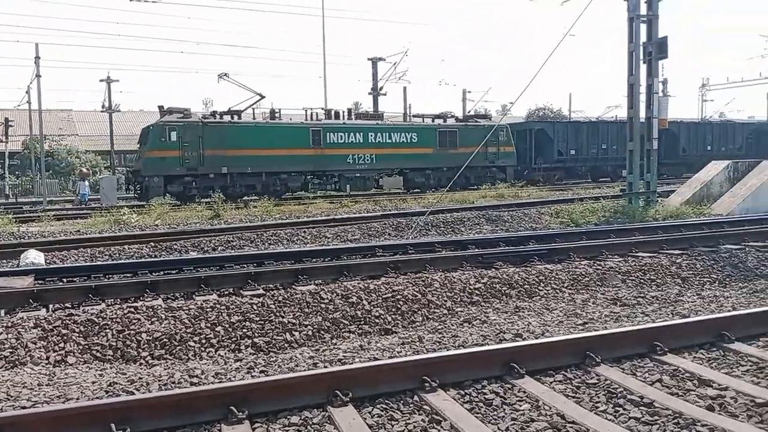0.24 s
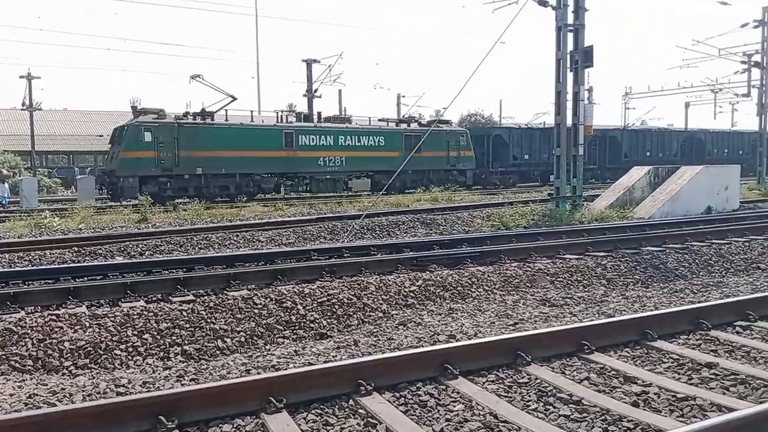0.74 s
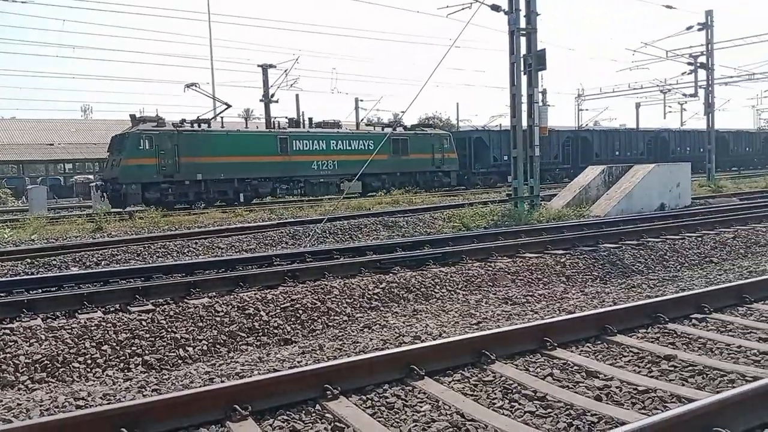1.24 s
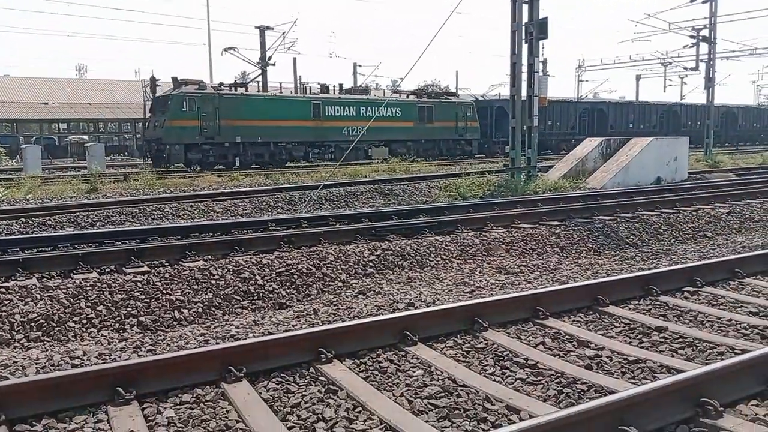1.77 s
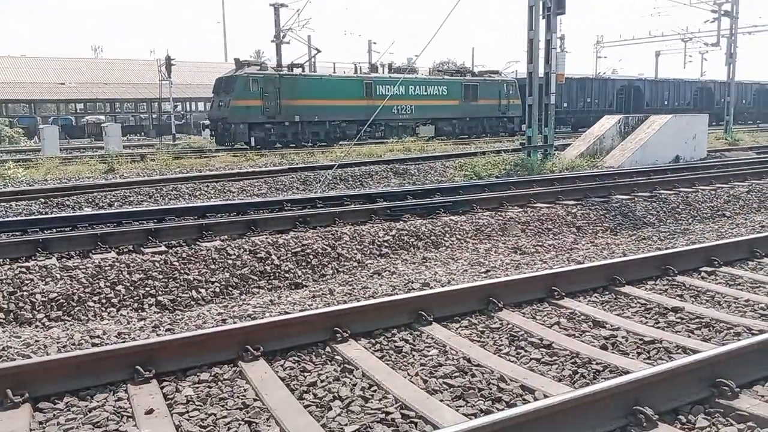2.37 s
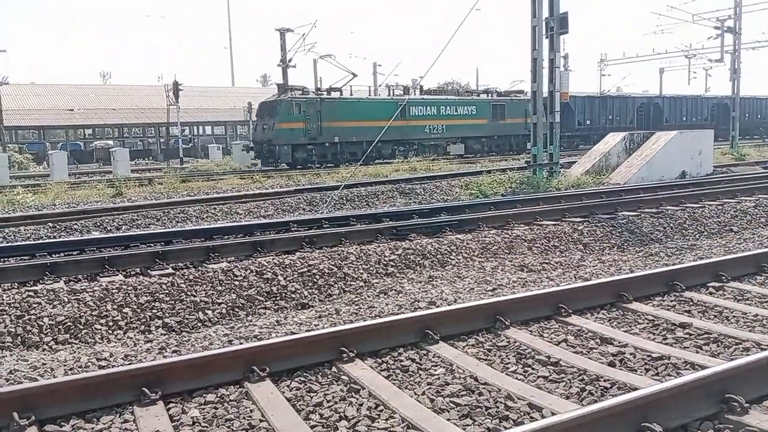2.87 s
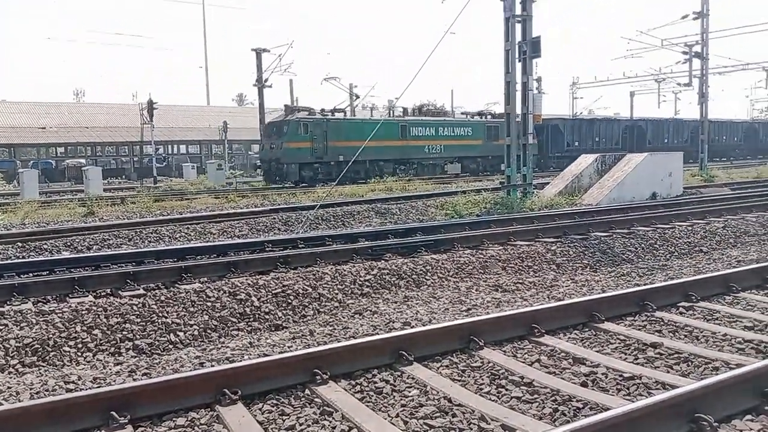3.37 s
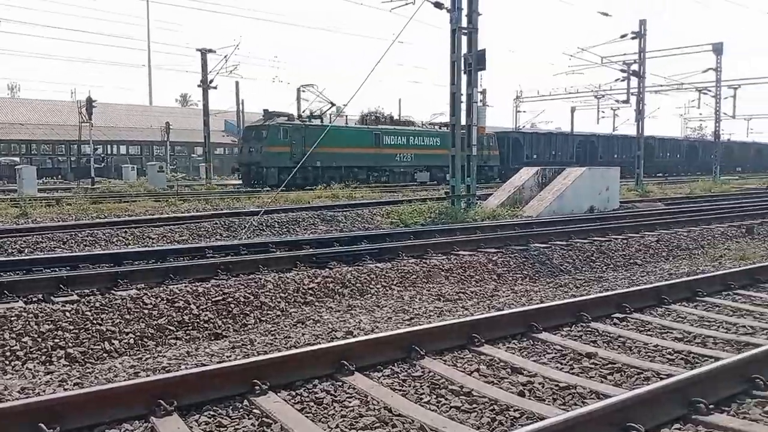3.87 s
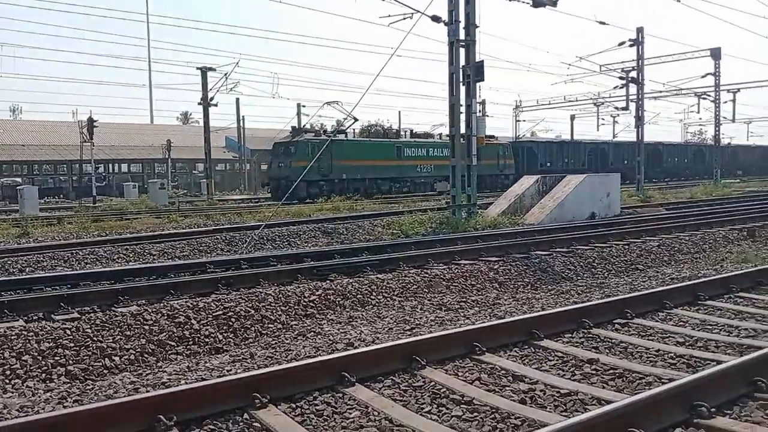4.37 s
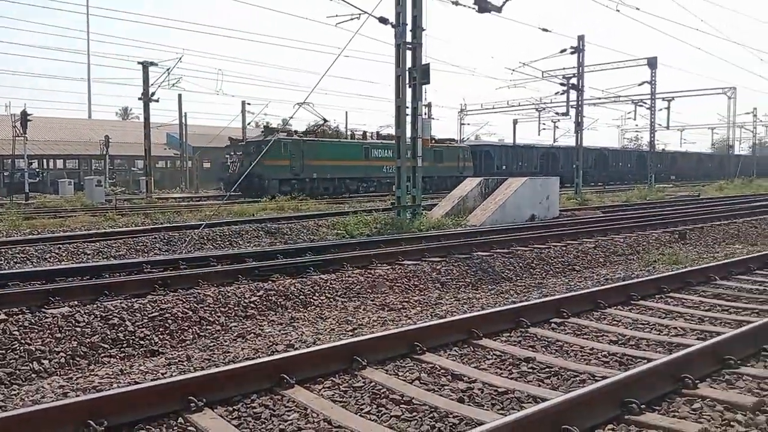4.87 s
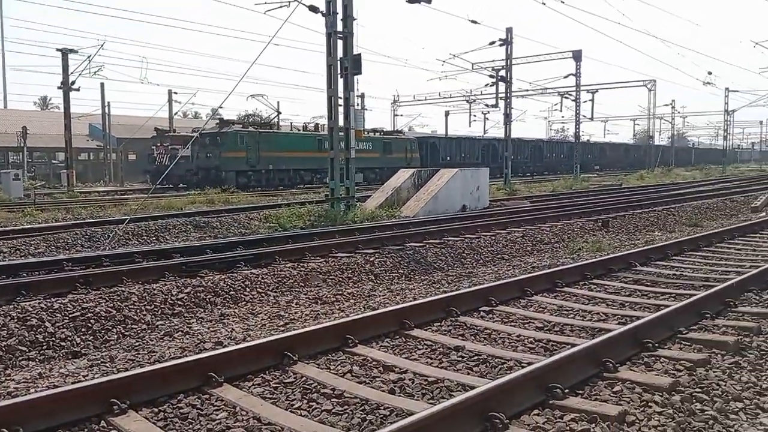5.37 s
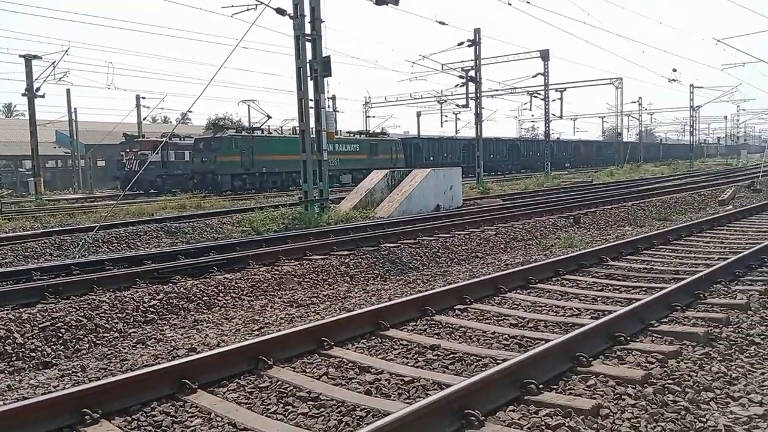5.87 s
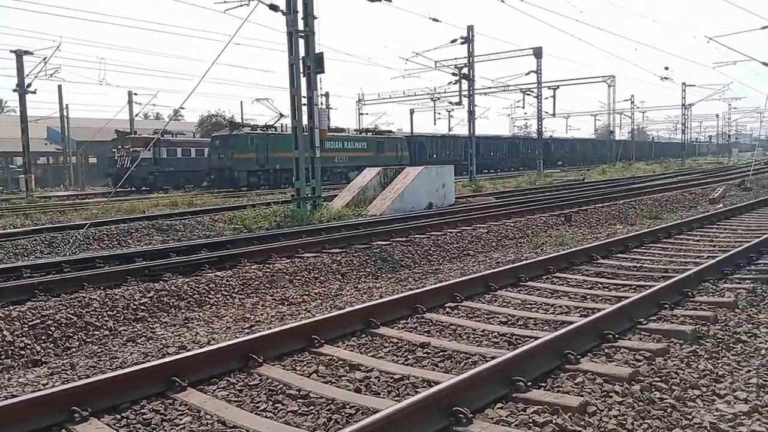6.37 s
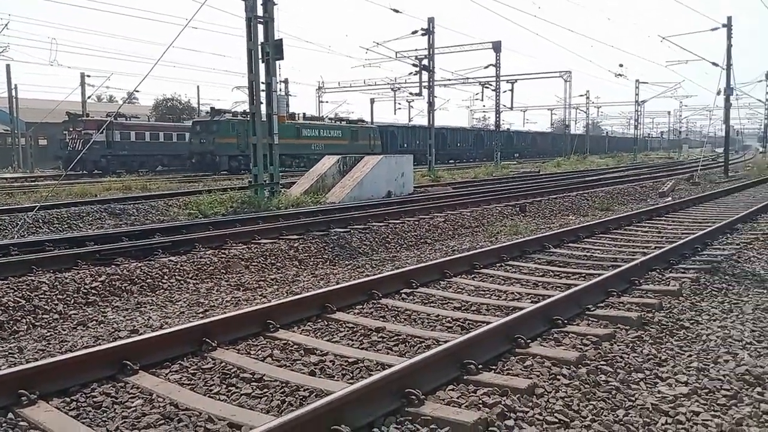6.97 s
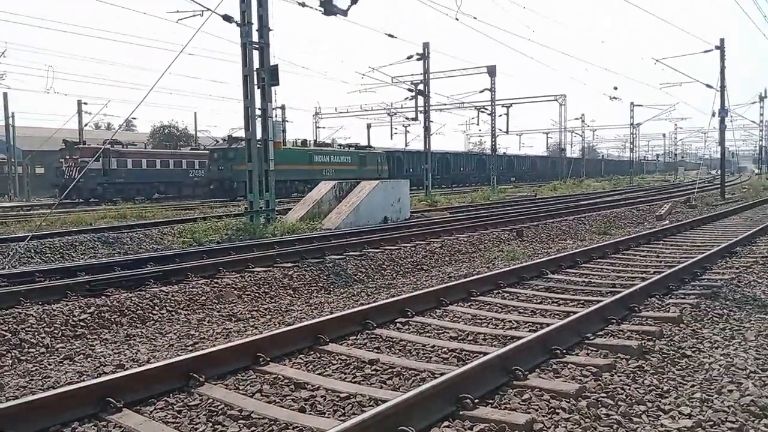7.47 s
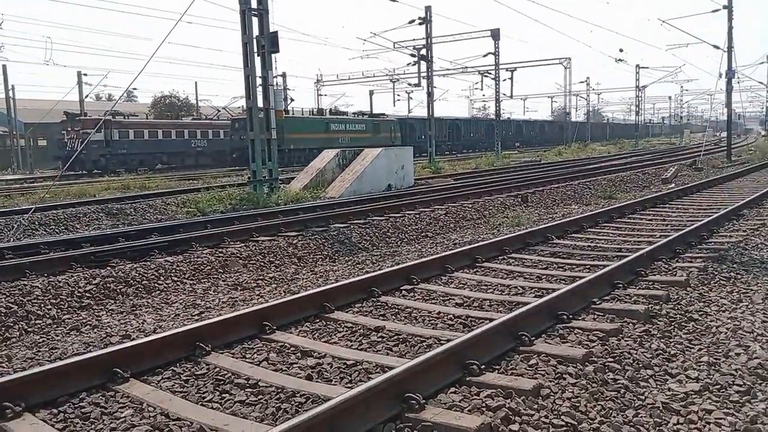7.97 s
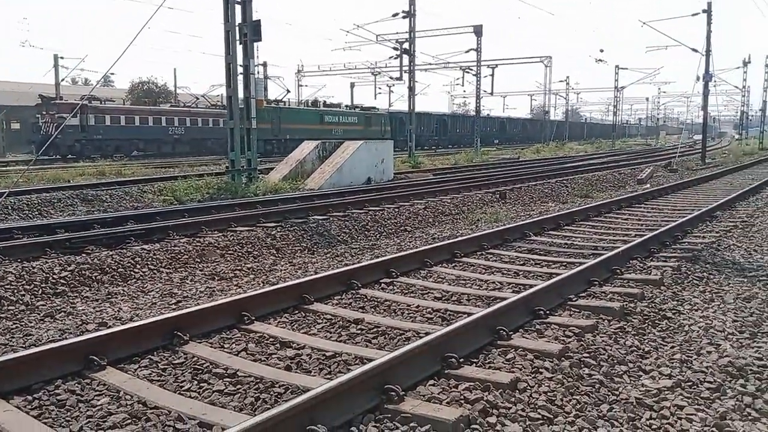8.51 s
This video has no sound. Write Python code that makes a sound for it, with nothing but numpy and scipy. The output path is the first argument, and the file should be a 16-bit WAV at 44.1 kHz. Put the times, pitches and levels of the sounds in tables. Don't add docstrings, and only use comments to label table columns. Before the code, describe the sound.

Outdoors beside rail yard tracks, a phone picks up a freight locomotive rolling slowly away. A soft gritty wheel-and-fan wash and wavering low hum with a thin whine run throughout, with faint, high flange squeals mainly in the first second. Two quick air spits come near 0.65 and 0.7 s, then a strong broad hiss swells from 0.9 to 1.5 s. A small puff ticks at 2.0 s. A brighter blast follows from 2.8 to 3.25 s, then a quieter gap. At 4.4 s a sharp burst runs into a longer hiss that sags until 5.3 s; another lasts from 5.5 to 5.8 s. From 6.2 to 7.5 s somewhat softer bursts nearly join, and a last one swells at 7.7 s, peaks near 8 s and trails into the end around 8.7 s. Brief echoes follow closings; light wind bumps the microphone.

```python
import sys
import numpy as np
from scipy import signal
from scipy.fft import rfft, irfft
from scipy.io import wavfile
from scipy.ndimage import uniform_filter1d, minimum_filter1d

SR = 44100
rng = np.random.default_rng(int(sys.argv[2]) if len(sys.argv) > 2 else 0)


def attenuation_scalar(level_db):
    decades = np.asarray(level_db, float) / 20
    return 10 ** decades


def store_pcm(level_fs):
    pcm = np.round(np.clip(level_fs, -1, 1) * 32767).astype(np.int16)
    wavfile.write(sys.argv[1], SR, np.atleast_2d(pcm).T)


N = 385564

# (valve opens [s], pressure crest [s], valve shuts [s], closing time [s])
BURSTS = [(.646, .66, .697, .012), (.71, .72, .765, .02), (.931, 1.14, 1.54, .02),
          (2.015, 2.06, 2.105, .02), (2.777, 3.1, 3.255, .05), (4.374, 4.395, 4.52, .02),
          (4.513, 4.525, 5.29, .055), (5.467, 5.5, 5.777, .04), (6.234, 6.26, 6.51, .04),
          (6.49, 6.53, 6.94, .05), (6.925, 7.2, 7.49, .06), (7.689, 7.98, 8.45, 3)]
# (core at crest [dB], first puff against crest [dB], sag until shutting [dB],
# sag shape [power], yard echo below that [dB])
STROKES = [(-37.5, -3, -1.5, 1.3, -4), (-24.5, 1, -14, 0.5, -2), (-16, -1.5, -5.5, 2.5, -5.5),
           (-31, -10, -8.5, 1.2, -9), (-15.5, -2.5, -5, 0.76, -13.5), (-18, 0, -3, 0.97, -26),
           (-18, 7, -9.5, 0.46, -13), (-15.5, -6, -7, 0.41, -17), (-21.5, -3, -1.5, 1, -2),
           (-21.5, -22, -4, 0.57, -1), (-23.5, 0, -6.5, 3.1, -11), (-22.5, -3.5, -5.5, 0.92, -16)]
# (roar on opening [dB], roar on shutting [dB], shoulder at crest [dB], fizz [dB])
JETS = [(-1, 3.5, -10, -18), (-3, -1.5, -13, -22), (-1, -15, -9, -12.5), (-8, 2.5, -9, -16),
        (-2, -16.5, -3.5, -16.5), (-1, -9.5, 2.5, -15), (-2, -6.5, 2.5, -14.5), (-13, -11, -2, -18),
        (-5.5, -11, -10, -20), (-14, -6, -11.5, -21), (-4.5, -9, -10, -19), (-7.5, -12, -7.5, -17)]
# (lowest ground hollow [factor], upper hollows [factor], rumble [dB], top sizzle [dB])
OUTLETS = [(.8, .8, 10, 5), (-2, .8, 4.5, 4), (0, .9, -0.5, -5), (0, .8, -15, -8), (1.5, 0.35, 22, 4),
           (2, 0.88, 5, 1), (1.5, 0.93, 1, 1), (0.5, 1.3, -12, -6), (1.5, 0.98, 0, -4), (1, 0.64, -4, -2),
           (0, 0.44, -9, -2), (-0.5, 0.3, -23, -7)]
# (pitch on opening [Hz], pitch on shutting [Hz], level [dB])
RINGS = [(5500, 5500, 4), (5600, 4800, 3.5), (5740, 8000, 0), (5500, 5500, -0.5), (5500, 7000, 3.5),
         (5800, 6300, 5), (6140, 5420, 5.5), (6100, 5350, 5), (5450, 5600, 0.5), (5760, 6400, 1),
         (6140, 4770, 4.5), (5900, 5150, 2.5)]
# (centre [Hz], width [Hz], level [dB])
WAGON_LOBES = [(3000, 400, -12), (2960, 400, -15), (3040, 230, -0.5), (3000, 400, 7), (4430, 210, -13),
               (7270, 350, 6), (3150, 120, 1.5), (4900, 560, -2.5), (3400, 160, 5.5), (6180, 260, -12),
               (4730, 320, 5.5), (3280, 390, 8)]
# (centre [Hz], width [Hz], on opening [dB], on shutting [dB])
DRIFTING_LOBES = [(3500, 200, 10, 12), (1840, 180, -6, -6), (2900, 400, 3.5, 5), (3000, 400, -1, 2),
                  (3100, 630, -3.5, 7), (8200, 500, -2, 4), (4630, 440, -5, 4), (4550, 450, -1, 0),
                  (8500, 500, -2, 1.5), (8500, 500, 1.5, -1), (2050, 300, -1, 4), (2110, 430, 7.5, -11)]
# (on opening [dB], on shutting [dB])
AIR = [(5, -1), (2, 5), (-1.3, 4.5), (-12, 1), (7, -0.5), (0, -1), (2, 0), (2, 4), (-1, -3), (0.3, 0.3),
       (-3, 2), (-5, -2.5)]
# (roar against core [dB], fizz against core [dB], fizz dying [dB/s],
# loss at the very top [dB per dB of faintness])
TAILS = [(-.4, -.4, 168, 1.3), (-.4, -.4, 120, 1.3), (-.4, -5, 85, 1.5), (-.4, -.4, 168, 1.3),
         (-.4, -3, 140, 1.2), (-.4, -.4, 168, 1.3), (-9, -.4, 168, 1.1), (3, -3, 168, 1.5),
         (-.4, -.4, 168, 1.3), (-.4, -.4, 168, 1.6), (1.5, -.4, 240, 1.9), (-.4, -.4, 168, 1.3)]
SHADED_DB = [2, .2, -7, .2, 2, 3, -1, -4, -15, .2, 6, -3]
# (frequency [Hz], density [dB per Hz])
NEAR_VALVE = [(410, -58), (700, -23.5), (787, -9.5), (994, -13.5), (1450, 0), (1700, -2.5), (2200, -4),
              (3050, -13.5), (3840, -21.5), (5520, -11), (6200, -16), (6790, -11), (7540, -10.5),
              (9900, -23.5), (12001, -17), (15600, -18)]
# (frequency [Hz], density [dB per Hz])
FAR_VALVE = [(1000, -45), (1700, -22.5), (1950, -20), (3140, -13.5), (4140, -11), (5080, 4), (5570, 6),
             (7030, -4.5), (7570, -6.5), (8940, -29), (10900, -31.5), (12300, -30.5), (13800, -28),
             (14900, -35.5), (15600, -24.5)]
# (from [Hz], to [Hz])
JET_BANDS = [
    (1900, 3600),
    (4600, 6300),
    (6500, 7800),
    (9000, 15500),
]
FAR_FROM_S, RING_WIDTH_HZ = 2.5, 430
SHADED_HZ, SHADED_WIDTH_HZ, SHADED_S = 3800, 430, 0.026
ECHO_FILL = .6


def valves():
    hz, t = stft_axes(size=256)
    power = np.full((len(hz), len(t)), 1e-15)
    ripples = rng.standard_normal((len(BURSTS), len(hz)))
    settings = zip(BURSTS, STROKES, JETS, OUTLETS, RINGS, WAGON_LOBES, DRIFTING_LOBES, AIR, TAILS,
                   SHADED_DB, ripples)
    for burst, stroke, jet, outlet, ring, lobe, drift, air, tail, shaded_db, ripple in settings:
        opens, _, shuts, closing = burst
        low, upper, rumble_db, sizzle_db = outlet
        spectrum = NEAR_VALVE if opens < FAR_FROM_S else FAR_VALVE
        colour = read(spectrum, hz) + dips(hz, low, upper) + 1.6 * ripple
        colour += rumble_db * np.interp(hz, [1000, 1900], [1, 0])
        colour += sizzle_db * np.interp(hz, [13800, 15300], [0, 1])
        colour[hz < 800] = -90
        colour += lobe[2] * bell(hz, *lobe[:2])[:, 0]

        on = (t >= opens) & (t < shuts + 1.2)
        now = t[on]
        levels = jet_levels(now, burst, stroke, jet, tail)
        field = steered(colour, hz, now, JET_BANDS, now, levels)

        faint_db = np.maximum(-45.5 - levels[-1], 0)
        field -= tail[3] * np.outer(np.interp(hz, [10500, 13500], [0, 1]), faint_db)

        ring_hz = np.interp(now, [opens, shuts], ring[:2])
        field += ring[2] * bell(hz, ring_hz, RING_WIDTH_HZ)
        airy = np.interp(hz, [11000, 12200, 14000, 14900], [0, 1, 1, 0])
        field += np.outer(airy, np.interp(now, [opens, shuts], air))
        field += bell(hz, *drift[:2]) * np.interp(now, [opens, shuts], drift[2:])
        closed = np.clip((now - shuts) / closing, 0, 1)
        field -= ECHO_FILL * np.outer(dips(hz, low, 0), closed)
        late = np.exp(-((now - opens) / SHADED_S) ** 4)
        field += shaded_db * bell(hz, SHADED_HZ, SHADED_WIDTH_HZ) * late
        power[:, on] += attenuation_scalar(2 * field)
    gust = evened(uniform_filter1d(rng.standard_normal(len(t)), size=8))
    return noise(10 * np.log10(power) + 0.17 * gust, 1.17, bins=2, frames=80)


LINGER = [
    1.8,
    1,
    1.2,
    1.7,
]
ECHO_DB_PER_S = [
    47,
    43,
    51,
]
ECHO_TINT_DB = [
    -0.5,
    0.4,
]
OPENING_S, HUSH_DB = .013, -24
SPIT_DB, SPIT_S = 2.5, 0.01
ROAR_LAG_DB, FIZZ_LAG_DB, LAG_S = -3.5, -1, 0.069
SHOULDER_SAG, FIZZ_SAG = 0.93, 0.36


def jet_levels(t, burst, stroke, jet, tail):
    opens, crest, shuts, closing = burst
    crest_db, first_db, sag_db, shape, echo_db = stroke
    roar_open, roar_shut, shoulder, fizz = jet
    age, after = t - opens, np.maximum(t - shuts, 0)
    sag = sag_db * np.clip((t - crest) / (shuts - crest), 0, 1) ** shape
    core = crest_db + np.interp(t, [opens, crest], [first_db, 0]) + sag
    core += SPIT_DB * np.exp(-age / SPIT_S)
    core += HUSH_DB * np.clip(1 - age / OPENING_S, 0, 1)
    lag = np.exp(-age / LAG_S)
    roar = np.interp(t, [opens, shuts], [roar_open, roar_shut]) + ROAR_LAG_DB * lag
    colours = [roar, 0 * t, shoulder + SHOULDER_SAG * sag, fizz + FIZZ_SAG * sag + FIZZ_LAG_DB * lag]
    tints = [tail[0], *ECHO_TINT_DB, tail[1]]
    fades = [*ECHO_DB_PER_S, tail[2]]
    levels = []
    for colour, slow, tint, fade in zip(colours, LINGER, tints, fades):
        lasts = closing * slow
        drop = np.minimum(after / lasts, 1) * (echo_db + tint)
        levels.append(core + colour + drop - fade * np.maximum(after - lasts, 0))
    return levels


# (centre [Hz], width [Hz], depth [dB])
GROUND_DIPS = [(3926, 325, -7), (8300, 420, -3), (10400, 250, -3.5), (13500, 600, -14)]


def dips(hz, low, upper):
    depths = [low] + [upper] * (len(GROUND_DIPS) - 1)
    return sum(depth * db * bell(hz, f, width)[:, 0] for depth, (f, width, db) in zip(depths, GROUND_DIPS))


# (time [s], machinery [dB], wheel hiss [dB])
ROLL = [(0, -28, -41), (.2, -26, -40), (.5, -28, -40.5), (.9, -26.5, -39.5), (1.4, -31, -33.5),
        (2, -30.5, -41), (2.7, -30.5, -38.5), (3.1, -38, -34.5), (3.6, -31.5, -41), (4.3, -37, -43.5),
        (4.8, -32.5, -30), (5.31, -36, -44.5), (6, -36, -46.5), (6.7, -34, -39.5), (7.2, -30, -42),
        (7.6, -33.5, -47), (8.1, -32.5, -39.5), (8.74, -32, -36.5)]
# (frequency [Hz], density [dB per Hz])
WASH = [(330, -37), (560, -23), (690, -0.5), (782, -5.5), (899, -5.5), (1060, -9.5), (1420, 4.5),
        (2190, -12), (3370, -15.5), (4270, -16), (5270, -13), (5810, -14), (7890, -29), (8570, -50.5),
        (11400, -61), (12600, -70), (15600, -80)]
# (from [Hz], to [Hz])
ROLL_BANDS = [
    (600, 1750),
    (2300, 3500),
    (3800, 4500),
    (4900, 7600),
    (8600, 11500),
]
# (time [s], level against upper hiss [dB])
HOLLOW = [(1.8, -7.5), (2.15, -14.5), (4.4, -12), (5.4, -6.5), (7.6, -10.5)]
# (time [s], level [dB])
WHEEL_FIZZ = [(0, -70), (.6, -68.5), (1.8, -74), (2.6, -75.5), (3.5, -76), (4.3, -80), (6, -76.5),
              (7.6, -77)]
# (centre [Hz], width [Hz], first [dB], midway [dB], last [dB])
WASH_LOBES = [(790, 37, .2, -3.5, 0.5), (1015, 54, -1, 1.5, 1), (1196, 66, 1.5, -3.5, -6.5),
              (1710, 140, -6.5, 0.6, -1), (2170, 170, 2, -0.5, -0.7), (3000, 410, -2.5, 1.5, -3),
              (3440, 130, 1, -0.5, 1.5), (5050, 360, 2, -3.5, 3)]
HISS_TOP_DB, HISS_TOP_SHARE = -41.5, 0.76


def rolling():
    hz, t = stft_axes(size=1024)
    s, machinery, hiss = np.transpose(ROLL)
    machinery, hiss = np.interp(t, s, machinery), np.interp(t, s, hiss)
    top = HISS_TOP_DB + HISS_TOP_SHARE * (hiss + 43)
    hollow = top + np.interp(t, *np.transpose(HOLLOW))
    fizz = np.interp(t, *np.transpose(WHEEL_FIZZ))
    field = steered(read(WASH, hz), hz, t, ROLL_BANDS, t, [machinery, hiss, hollow, top, fizz])
    for centre, width, *db in WASH_LOBES:
        field += bell(hz, centre, width) * np.interp(t, [0, N / SR / 2, N / SR], db)
    patchy_db = np.interp(hz, [1100, 1400, 2500, 4500, 5200, 7000, 9000], [4.4, 2.4, 3.6, 4.2, 2.4, 2.6, 6])
    return noise(field, patchy_db[:, None], bins=3, frames=18)


# (pitch [Hz], width [Hz], level [dB])
HUM_LINES = [
    [(215, 9.7, -8), (238.6, 9.3, -8), (227.7, 47.5, -3.5)],
    [(699, 2, -2), (1322, 26, -4)],
    [(887, 12.6, -7)],
    [(1394, 12.5, -3.5)],
]
# (start [s], length [s], level [dB])
PAIR_SWELLS = [(0, 0.32, -26), (0.32, 0.318, -27), (0.691, 0.031, -27), (0.748, 0.14, -32),
               (0.897, 0.18, -37.5), (1.17, 0.18, -39.5), (1.668, 0.041, -36), (1.741, 0.22, -36),
               (2.277, 0.2, -39), (2.496, 0.13, -30.5), (2.637, 0.36, -42), (3.766, 0.17, -37),
               (4.195, 0.18, -48), (4.34, 0.16, -38), (4.523, 0.099, -32.5), (4.7, 0.16, -35.5),
               (4.978, 0.1, -40), (5.109, 0.134, -36), (5.3, 0.36, -50), (5.748, 0.061, -40),
               (6.942, 0.063, -48), (8.01, 0.091, -38)]
WHINE_SWELLS = [(0, 0.16, -32), (.35, .4, -36), (1.56, 0.16, -36), (1.65, .7, -31.5), (2.55, .28, -31.5),
                (3.4, 0.097, -37), (3.72, 0.12, -44), (3.93, 0.16, -53), (4.15, 0.19, -39.5),
                (4.57, 0.025, -29), (4.7, 0.077, -37.5), (5, .2, -44), (5.35, 0.26, -44.5),
                (5.94, 0.25, -44), (6.2, 0.2, -43.5), (6.68, .25, -42), (7.04, 0.071, -41),
                (7.16, 0.44, -37.5), (7.8, 0.054, -36), (8, 0.099, -37), (8.15, 0.12, -34),
                (8.31, 0.17, -36.5), (8.48, 0.072, -43), (8.64, 0.063, -39)]
SECOND_SWELLS = [(.65, 0.21, -36), (.96, .3, -40), (1.66, 0.056, -34), (2.45, 0.041, -33), (2.8, 0.11, -29),
                 (3.76, 0.075, -31), (4.6, 0.044, -34), (4.8, 0.066, -41), (5.58, .12, -33),
                 (5.73, 0.16, -33), (5.95, 0.06, -36), (7.3, .3, -40), (8.1, .3, -43)]
OVERTONE_SWELLS = [(0, .5, -38), (.75, 0.23, -39), (1.75, .5, -44), (2.3, 0.68, -34.5), (3.78, .14, -29.5),
                   (3.96, 0.11, -31.5), (4.1, 0.059, -38), (4.7, 0.1, -48), (6.7, 0.092, -33), (8, .3, -45),
                   (8.35, .3, -36)]
# (first [dB], last [dB])
HUM_BED_DB = [
    (-51.5, -57),
    (-50.5, -50),
    (-44, -43.5),
    (-62, -64),
]
# (time [s], flutter [dB])
LINE_FLUTTER_DB = [(0, 1), (2.8, 1), (3.4, 3.5), (8.74, 2.5)]


def hum():
    t = np.arange(0, N, 64) / SR
    groups = zip([PAIR_SWELLS, WHINE_SWELLS, SECOND_SWELLS, OVERTONE_SWELLS], HUM_BED_DB)
    levels = np.array([swells(rows, t, bed_db, edge=0.032) for rows, bed_db in groups])
    flutter = uniform_filter1d(rng.standard_normal((len(t), len(levels))), size=30, axis=0).T
    levels += evened(flutter) * np.interp(t, *np.transpose(LINE_FLUTTER_DB)) * [[.9], [1], [.7], [.6]]
    out = np.zeros(N)
    for lines, level_db in zip(HUM_LINES, levels):
        smooth_db = np.interp(np.arange(N) / SR, t, level_db)
        for hz, width, db in lines:
            out += attenuation_scalar(db + smooth_db) * fuzzy_line(hz, width)
    return out


# (start [s], length [s], pitch [Hz], level [dB])
SQUEALS = [(0.034, 0.29, 10470, -65), (.09, 0.12, 9950, -63), (0.048, .2, 11300, -74),
           (0.435, 0.11, 9950, -57), (0.475, 0.15, 10400, -62), (0.49, 0.081, 9200, -56),
           (0.898, 0.039, 11700, -57), (2.18, .12, 9900, -72), (2.195, .25, 11550, -78),
           (3.45, .16, 11550, -72.5), (4.2, 0.18, 10700, -77), (4.22, .08, 9250, -78),
           (0.018, 0.22, 8600, -64), (.44, .15, 8650, -59.5), (0.682, 0.11, 9400, -65),
           (.82, .1, 10400, -73), (2.16, .15, 8500, -67), (2.55, .15, 11600, -81), (3.78, .05, 10500, -87),
           (5.337, 0.14, 3100, -44), (5.37, .06, 11800, -80), (6.19, .05, 12000, -82)]


def squeals():
    out = np.zeros(N)
    for s, length, hz, db in SQUEALS:
        tone = fuzzy_line(hz, 90, count=round(length * SR))
        grip = evened(uniform_filter1d(rng.standard_normal(SR), size=700))[:len(tone)]
        fade = signal.windows.tukey(len(tone), .5)
        out[round(s * SR):][:len(tone)] += attenuation_scalar(db + 3.1 * grip) * tone * fade
    return out


# (start [s], length [s], level [dB])
THUMPS = [(0, 0.039, -45), (.3, 0.32, -48), (0.565, 0.11, -41), (0.966, 0.058, -32), (1.182, 0.086, -44),
          (1.622, 0.26, -44.5), (1.86, 0.11, -52), (2.2, 0.13, -45), (2.413, 0.027, -38),
          (2.573, 0.11, -42.5), (3.49, .04, -45), (3.576, 0.039, -43), (3.82, 0.041, -43.5),
          (4.24, .06, -51), (4.48, 0.047, -40), (4.902, .06, -50), (5.16, 0.062, -50), (5.41, .05, -51),
          (5.59, 0.077, -50), (5.66, 0.13, -44), (6.5, 0.06, -45), (6.63, 0.052, -46), (7.148, .2, -55),
          (7.684, 0.038, -45), (7.87, .05, -46), (8.04, .06, -50), (8.514, 0.054, -40.5)]
# (start [s], length [s], level [dB])
FLUTTERS = [(.14, .04, -59), (.26, .23, -43), (.77, 0.073, -48), (1.2, 0.15, -50.5), (1.66, .1, -65),
            (3.45, 0.032, -44), (4.8, 0.066, -47), (5.06, 0.037, -46), (7.57, 0.049, -62),
            (7.83, 0.03, -40), (8.04, 0.043, -47)]
# (first [dB], last [dB])
BREEZE_DB = [
    (-51, -57.5),
    (-59, -60),
]
# (frequency [Hz], density [dB per Hz])
WIND_COLOUR = [(15, -56), (32, -43), (48, -36), (70, 3), (90, -3.5), (135, -2), (190, -14.5), (280, -6.5),
               (350, -10), (480, -24), (600, -21), (800, -56), (1500, -99)]
# (from [Hz], to [Hz])
WIND_BANDS = [
    (40, 180),
    (275, 560),
]


def wind():
    hz, t = stft_axes(size=1024)
    gusts = zip([THUMPS, FLUTTERS], BREEZE_DB)
    levels = [swells(rows, t, bed_db, edge=0.097) for rows, bed_db in gusts]
    return noise(steered(read(WIND_COLOUR, hz), hz, t, WIND_BANDS, t, levels), 2.6, bins=3, frames=6)


# (time [s], level [dB])
HAZE_DB = [(0, -72), (1, -73), (2.5, -77), (8.74, -78)]


def haze():
    return attenuation_scalar(np.interp(np.arange(N) / SR, *np.transpose(HAZE_DB))) * rng.standard_normal(N)


# (frequency [Hz], gain [dB])
GUARD = [(1800, 0), (2300, -5), (3400, -5), (4100, -9), (4600, -8), (5100, -1), (6800, -1), (8000, -7),
         (11500, -8), (13000, 0)]
GUARD_RANGE_DB = 5


def guarded(x):
    hz, t, z = signal.stft(x, SR, nperseg=768, noverlap=576)
    level_db = 10 * np.log10(abs(uniform_filter1d(abs(z) ** 2, size=9, axis=1)) + 1e-16)
    floor_db = np.percentile(level_db[:, ::6], 8, axis=1)[:, None]
    free = np.clip((level_db - floor_db) / GUARD_RANGE_DB, 0, 1)
    free = minimum_filter1d(free, size=5, axis=1)
    cut_db = read(GUARD, hz)[:, None] * (1 - np.roll(free, shift=11, axis=1))
    return signal.istft(z * attenuation_scalar(cut_db), SR, nperseg=768, noverlap=576)[1][:N]


# (centre time [s], from [Hz], to [Hz], level [dB])
SPLITS = [(1.59, 9600, 11900, -53), (3.22, 13100, 15300, -48), (3.22, 8900, 10400, -50),
          (3.245, 9600, 11100, -49), (3.41, 5600, 7000, -43), (3.82, 7500, 9000, -53),
          (3.845, 6900, 8300, -54), (4.795, 11700, 15300, -47), (4.845, 13100, 15300, -47),
          (5.075, 5600, 7000, -30), (5.075, 10300, 12500, -53), (6.75, 10300, 11800, -57),
          (7.378, 7500, 9000, -45), (7.865, 6860, 10400, -40), (7.865, 11700, 13200, -52),
          (8.14, 7500, 9000, -45)]


def splits():
    out, hz = np.zeros(N), np.fft.rfftfreq(2048, 1 / SR)
    fade = np.sqrt(signal.windows.tukey(2048, .9))
    for s, low_hz, high_hz, db in SPLITS:
        band = irfft(rfft(rng.standard_normal(2048)) * ((hz > low_hz) & (hz < high_hz)))
        out[round(s * SR) - 1024:][:2048] += attenuation_scalar(db) * evened(band) * fade
    return np.outer([1, -1], out)


def evened(x):
    return x / np.sqrt(np.mean(x ** 2) + 1e-20)


def read(points, hz):
    f, value = np.transpose(points)
    return np.interp(np.log(hz + 1), np.log(f + 1), value)


def bell(hz, centre, width):
    return np.exp(-((hz[:, None] - centre) / width) ** 2)


def stft_axes(size):
    return np.fft.rfftfreq(size, 1 / SR), np.arange(4 * N // size + 5) * size / 4 / SR


def band_db(db, hz, edges):
    return 10 * np.log10(np.sum(attenuation_scalar(2 * db[(hz >= edges[0]) & (hz < edges[1])])))


def steered(colour, hz, t, bands, s, levels):
    owner = np.repeat(np.arange(len(bands)), 2)
    blend = np.array([np.interp(hz, np.ravel(bands), owner == k) for k in range(len(bands))])
    shift = [np.interp(t, s, level) - band_db(colour, hz, band) for band, level in zip(bands, levels)]
    return colour[:, None] + blend.T @ shift


def noise(field_db, patchy_db, bins, frames):
    size = 2 * (len(field_db) - 1)
    a, b, patches = rng.standard_normal(field_db.shape[::-1] + (3,)).T
    patches = evened(uniform_filter1d(uniform_filter1d(patches, bins, 0), frames, 1))
    z = (a + 1j * b) * attenuation_scalar(field_db + patchy_db * patches)
    return np.sqrt(3 / 2) * signal.istft(z, nperseg=size, noverlap=3 * size // 4)[1][:N]


def fuzzy_line(hz, width, count=N):
    r = np.exp(-np.pi * width / SR)
    a, b = rng.standard_normal((count + SR, 2)).T
    slow = signal.lfilter([1], [1, -r], signal.lfilter([1], [1, -r], a + 1j * b))[SR:]
    slow = slow / abs(slow) ** np.interp(width, [4, 9], [.92, .45])
    return evened((slow * np.exp(2j * np.pi * hz * np.arange(count) / SR)).real)


def swells(rows, t, bed_db, edge):
    s, length, db = np.transpose(rows)[:, :, None]
    inside = np.clip(np.minimum(t - s, s + length - t) / edge + .5, 0, 1)
    bed = attenuation_scalar(np.interp(t, [0, N / SR], bed_db))
    bumps = attenuation_scalar(db) * np.sin(np.pi / 2 * inside) ** 2
    return 10 * np.log10(bed ** 2 + np.sum(bumps ** 2, axis=0))


DUCK_FROM_DB, DUCK_SHARE = -23, 0.42


def scene():
    jets = valves()
    jet_power = abs(uniform_filter1d(np.roll(jets, shift=1800) ** 2, size=5000))
    loud_db = 10 * np.log10(jet_power + 1e-12)
    duck = attenuation_scalar(-DUCK_SHARE * np.maximum(loud_db - DUCK_FROM_DB, 0))
    mono = jets + rolling() + duck * (hum() + wind()) + squeals() + haze()
    return np.array([guarded(mono)] * 2)


def top_cut(x):
    return signal.sosfilt(signal.butter(12, 16720, fs=SR, output="sos"), x)


def record(dry):
    clipped = np.clip(dry, -.8, .8)
    bass_cut = signal.butter(2, 52, "high", fs=SR, output="sos")
    edge = signal.firwin(1401, 15505, window=("kaiser", 9), fs=SR)
    limited = signal.oaconvolve(signal.sosfilt(bass_cut, clipped), edge[None], "same")
    return top_cut(limited + splits())


dry = scene()
out = record(dry)
store_pcm(out)
```